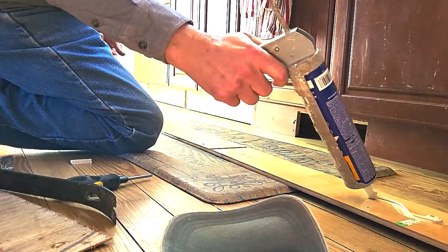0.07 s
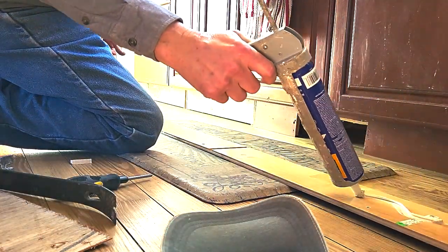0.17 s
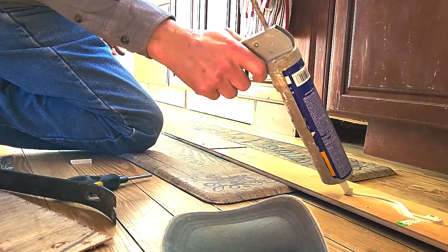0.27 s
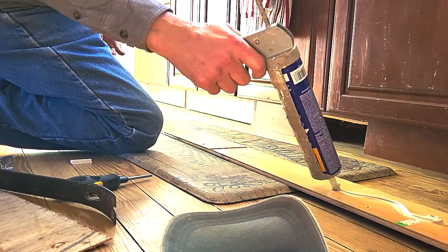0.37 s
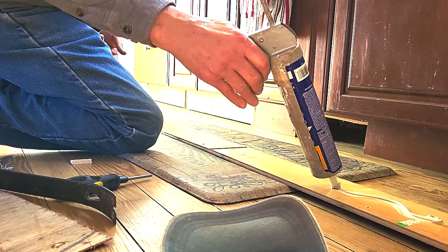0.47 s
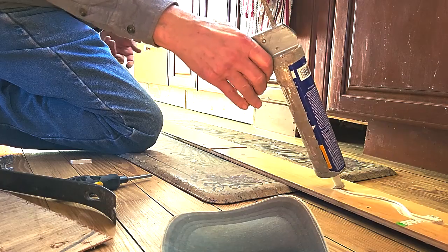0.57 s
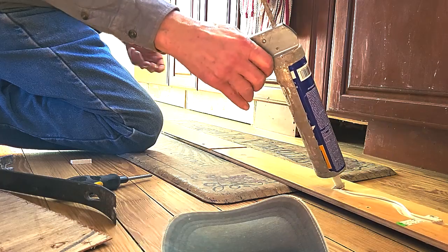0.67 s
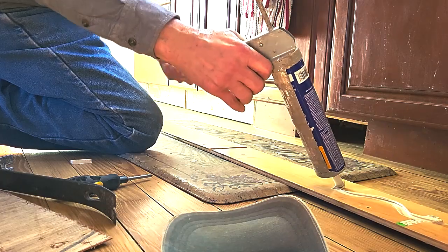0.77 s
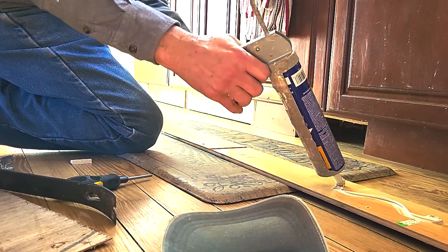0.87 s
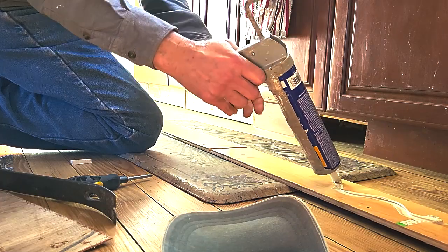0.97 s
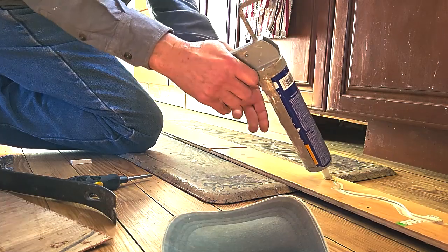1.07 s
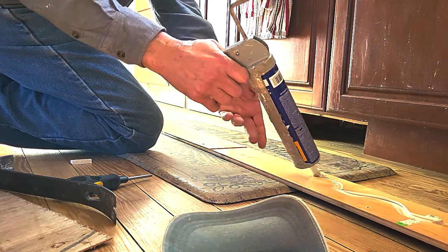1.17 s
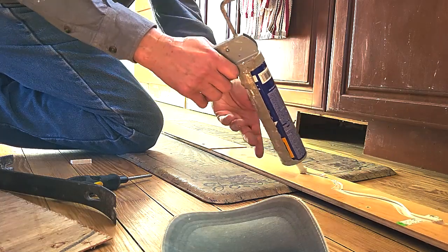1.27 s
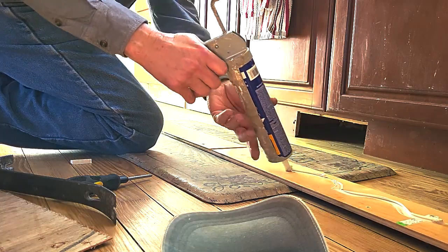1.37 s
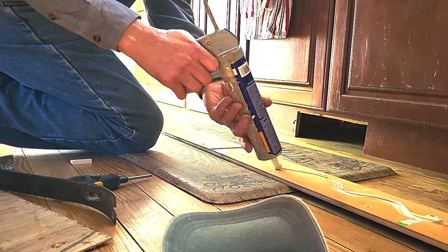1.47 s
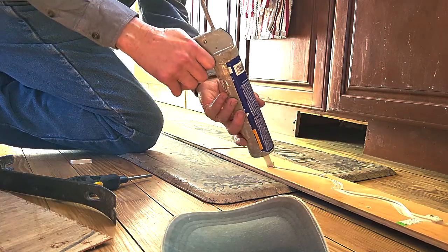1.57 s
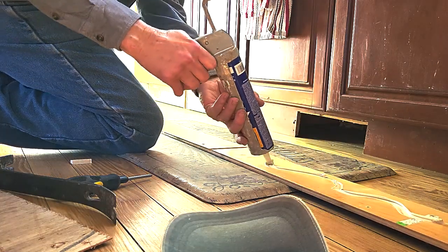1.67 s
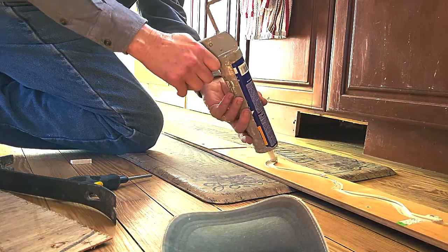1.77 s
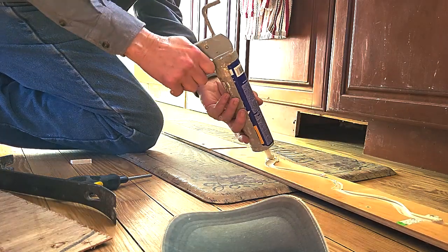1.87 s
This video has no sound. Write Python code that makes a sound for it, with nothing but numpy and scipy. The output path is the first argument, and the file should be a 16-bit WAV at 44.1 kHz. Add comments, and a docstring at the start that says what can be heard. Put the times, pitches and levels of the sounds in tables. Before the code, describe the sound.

Close metal clicks of a caulking gun's trigger and ratchet, then near silence with faint room hum

```python
"""The hum, low rumble and faint hiss of a quiet house come first, with a soft brush of cloth: filtered noise
and wavering sines. Then a caulking gun, close and a little to the right, ticks, snaps and rattles: bursts
of rough contact excite modes of its steel. The cartridge knocks hollowly, narrow hisses swell and a spring
ticks late. Decaying bands of noise form the room's answer to the gun, knocks and spring."""
import sys
import numpy as np
from scipy import signal
from scipy.fft import rfft, irfft
from scipy.io import wavfile
from scipy.ndimage import uniform_filter1d

SR = 44100
rng = np.random.default_rng(int(sys.argv[2]) if len(sys.argv) > 2 else 0)


def gain_from_db(level_db):
    """Convert decibel levels to linear amplitude factors (20 dB per decade)."""
    decades = np.asarray(level_db, float) / 20
    return 10 ** decades


def file_out(sig):
    """Save sig as 16-bit WAV at sys.argv[1]."""
    # one column per channel
    cols = np.atleast_2d(sig).T
    # limit, then scale
    lim = np.clip(cols, -1, 1)
    pcm = np.round(lim * 32767).astype(np.int16)
    wavfile.write(sys.argv[1], SR, pcm)


N = 83790  # length in samples
HIT_N = 8192  # samples in one contact and its direct ring


def band(x, lo_hz, hi_hz, order=2):
    """Butterworth band-pass: passes the range between two edges with a maximally flat response."""
    sos = signal.butter(order, [lo_hz, min(hi_hz, .48 * SR)], "band", fs=SR, output="sos")
    return signal.sosfilt(sos, x)


def ring(x, modes):
    """Modal superposition: x drives damped resonators, each a single complex pole."""
    out = 0
    for hz, db, t60_s in modes:
        pole = np.exp(2j * np.pi * hz / SR - np.log(1000) / (t60_s * SR))
        out = out + gain_from_db(db) * signal.lfilter([1], [1, -pole], x).imag
    return out


def unit(x):
    """Power normalisation: scales to rms 1."""
    return x / np.sqrt(np.mean(x ** 2))


def peak(x):
    """Short-time normalisation: sqrt(2) times the largest rms over 256 samples becomes 1."""
    return x / np.sqrt(2 * np.max(uniform_filter1d(x ** 2, size=256)))


def walk(rate_hz):
    """Slow modulation: random levels held for 1 / rate_hz and smoothed twice."""
    hold = int(SR / rate_hz)
    steps = np.repeat(rng.standard_normal(N // hold + 1), hold)
    return 0.6 * uniform_filter1d(uniform_filter1d(steps, hold), hold)[:N]


def sides(pan_db):
    """Level panning: left and right gains whose ratio, left over right, is pan_db."""
    return gain_from_db(np.array([[pan_db], [-pan_db]]) / 2)


# Spectrum of the quiet house. Each row: frequency in Hz, relative noise density in dB per Hz.
HOUSE_SPECTRUM = [(12, -24.5), (24, -7), (53, -3.5), (86, -7), (124, -4.5), (156, -11), (189, -5),
                  (218, -14.5), (244, -15), (270, -12), (340, -16.5), (440, -23), (520, -23.5),
                  (670, -28.5), (1020, -29), (1250, -36), (1600, -40), (2200, -38.5), (2700, -46.5),
                  (3600, -44.5), (4600, -43), (5400, -40.5), (7700, -44.5), (8600, -54), (10500, -49.5),
                  (12500, -54.5), (13200, -57.5), (15500, -62.5), (16500, -69.5)]
HOUSE_DB = -56.5  # rms of both sides together, before the low drift
SAME_HZ, BASS_SIDE, SIDE_MAX = 900, .07, 0.82  # the side share grows up to about SAME_HZ


def house():
    """Coloured noise with frequency-dependent coherence: rumble and hiss, nearly alike at both sides when low."""
    f = np.arange(N // 2 + 1) * SR / N + 1e-9
    hz, db = np.array(HOUSE_SPECTRUM).T
    colour = gain_from_db(np.interp(np.log(f), np.log(hz), db))
    mid, side = rfft(rng.standard_normal((2, N))) * colour
    side = side * np.minimum((f / SAME_HZ) ** 1.4 + BASS_SIDE, SIDE_MAX)
    air = gain_from_db(HOUSE_DB) * unit(irfft(np.array([mid + side, mid - side]), N))
    low = band(air, 9.7, 410)
    return air + low * (gain_from_db(0.5 * walk(4.9)) - 1)  # only the low band drifts


# Partials of the mains hum. Each row: centre frequency in Hz, rms in dB about which the level wavers.
HUM_PARTIALS = [(59.5, -67), (119.5, -60.5), (185, -68), (241, -70.5)]
HUM_WAVER_DB = -2  # per unit of walk


def hum():
    """Additive synthesis: mains partials, each with slow amplitude and phase modulation."""
    t, out = np.arange(N) / SR, 0
    for hz, db in HUM_PARTIALS:
        level = np.sqrt(2) * gain_from_db(db + HUM_WAVER_DB * walk(7.3))
        cycles = hz * t + 0.29 * walk(6.2) + rng.random()
        out = out + level * np.sin(2 * np.pi * cycles)
    return out


# Course of the brushing. Each row: time in seconds, gain in dB.
BRUSHING = [(0, -70), (.08, -77.5), (.7, -87), (0.899, -78.5), (1.049, -81), (1.15, -82.5), (1.399, -87.5),
            (1.501, -94), (1.57, -78), (1.7, -79.5), (1.76, -87), (1.9, -74)]
# Resonances of the cloth. Each row: centre in Hz, width in Hz, relative level in dB.
WEAVE_RESONANCES = [(2080, 700, 3), (4400, 810, -1), (6500, 1200, -2)]


def cloth():
    """Friction noise: fine random contacts heard through broad resonances of uneven level."""
    mid, side = rng.standard_normal((2, N))
    fibres = np.array([mid + .6 * side, mid - 0.79 * side])
    rub = 0
    for hz, width, db in WEAVE_RESONANCES:
        rub = rub + gain_from_db(db + 1.8 * walk(15)) * unit(band(fibres, hz - width / 2, hz + width / 2))
    times, levels_db = np.array(BRUSHING).T
    return gain_from_db(np.interp(np.arange(N) / SR, times, levels_db)) * rub


# Decay of the room. Each row: frequency in Hz, t60 in seconds, relative starting level in dB.
ROOM_DECAY = [(300, 0.24, -17), (800, 0.66, -13.5), (1470, 0.7, -18.5), (2200, 0.49, -19),
              (3660, 0.48, -20), (5960, 0.46, -23.5), (8500, 0.27, -21.5), (10850, 0.3, -14.5),
              (15000, 0.15, -15.5)]
# Bands of the slower tail from the next room. Each row: lower edge in Hz, upper edge in Hz.
NEXT_ROOM_BANDS = [(1930, 2070), (2290, 2480)]
LATE_T60_S, LATE_DB = 1, -31.5  # that tail's decay, and its level relative to the same reference
BUILD_S = 0.006  # time constant with which reflections build up


def reflections():
    """Statistical reverberation: noise bands and the exponential decay of each."""
    t = np.arange(SR) / SR
    hz, t60_s, start_db = np.array(ROOM_DECAY).T
    centres = 150 * 2 ** np.arange(0, 7, .5)
    noise = [band(rng.standard_normal((2, 2 * SR)), c / 2 ** 0.31, c * 2 ** 0.24) for c in centres]
    noise.append(sum(band(rng.standard_normal((2, 2 * SR)), *edges) for edges in NEXT_ROOM_BANDS))
    t60 = np.interp(np.log(centres), np.log(hz), t60_s)[:, None]
    db = np.interp(np.log(centres), np.log(hz), start_db)[:, None]
    decay = np.vstack([gain_from_db(db - 60 * t / t60), gain_from_db(LATE_DB - 60 * t / LATE_T60_S)])
    return np.array(noise), decay * (1 - np.exp(-t / BUILD_S)) / 10


def room(x, walls):
    """Convolution with a diffuse response, cut afresh from the noise and unlike at the two microphones."""
    noise, decay = walls
    i = rng.integers(SR)
    response = np.einsum("bct,bt->ct", noise[:, :, i:i + SR], decay)
    return signal.fftconvolve(x, response, axes=1)


RISE_SHARE = .2  # rise time constant over decay time constant
UNLIKE = .7  # amplitude of each side's own noise beside the common noise
LAG_S = .0001  # the left microphone hears the contact later


def chatter(decay_s):
    """Rough-contact excitation: a noise burst with a fast rise and decay, partly unlike and later at the left."""
    t = np.arange(HIT_N) / SR
    same, left, right = rng.standard_normal((3, HIT_N))
    envelope = np.exp(-t / decay_s) * (1 - np.exp(-t / (RISE_SHARE * decay_s)))
    hit = envelope * (same + UNLIKE * np.array([left, right]))
    return np.array([np.roll(hit[0], round(LAG_S * SR)), hit[1]])


# Bands in which the steel is balanced. Each row: lower edge in Hz, upper edge in Hz.
STEEL_BANDS = [(1750, 2750), (2750, 5300), (5300, 8100), (8100, 11500), (11500, 16000)]
# Unresonant crack of the contact: one level in dB per band, beside modes at 0 dB in the direct sound.
CRACK_LEVELS = [-7, -1, -1, 3, 5]


def voice(hit, modes, k, ring_db):
    """Source and resonator: in band k the contact's crack joins the modes it excites, at rms 1."""
    lo, hi = STEEL_BANDS[k]
    own_modes = [m for m in modes if lo <= m[0] < hi]
    steel = band(ring(hit, own_modes), lo / 1.007, hi * 1.117)
    crack = band(hit, lo, hi, order=4)
    return unit(gain_from_db(ring_db) * unit(steel) + gain_from_db(CRACK_LEVELS[k]) * unit(crack))


# Band of the gun's body, below the steel bands: lower edge in Hz, upper edge in Hz.
BODY_BAND = (680, 1150)
GUN_PAN_DB, ROOM_PAN_DB = -2.5, -4  # left over right, direct and by way of the room
ROOM_RING_DB, ROOM_RING_SHARE = 0.5, .45  # toward the walls: level of the modes, factor on their t60


def gun(walls, clicks, modes, body_db):
    """Directivity: the near sound shows each mode, while the walls get a colour smoothed over all directions."""
    out = np.zeros((2, N + 2 * SR))
    blow = signal.unit_impulse(HIT_N)
    wide = [(hz, db, t60_s * ROOM_RING_SHARE) for hz, db, t60_s in modes]  # shorter, so broader
    smooth = [voice(blow, wide, k, ROOM_RING_DB) for k in range(len(STEEL_BANDS))]
    for start_s, chatter_s, *bands_db in clicks:
        hit, i = chatter(chatter_s), int(start_s * SR)
        near = far = gain_from_db(bands_db[0] + body_db) * peak(band(hit, *BODY_BAND))
        for k, db in enumerate(bands_db):
            sound = gain_from_db(db) * peak(voice(hit, modes, k, 0))
            near = near + sound
            far = far + np.sqrt(np.mean(sound ** 2)) * smooth[k]
        wet = sides(ROOM_PAN_DB) * room(far, walls)
        out[:, i:i + HIT_N] += sides(GUN_PAN_DB) * near
        out[:, i:i + wet.shape[1]] += wet
    return out[:, :N]


# Clicks of the steel parts. Each row: start in seconds, chatter decay constant in seconds, then
# five short-time peaks in dB before panning, one per steel band.
TRIGGER_CLICKS = [(.0901, 0.0036, -38, -40, -40, -53, -53), (.130, .004, -58, -58, -56, -72, -74),
                  (.189, .004, -61, -62, -58, -78, -80), (.4068, .002, -45, -45, -48, -52, -50),
                  (0.4091, 0.0038, -30, -29, -27.5, -36, -31.5), (.4128, .002, -32, -28, -29, -35, -34),
                  (.428, .004, -38, -46, -46, -58, -56), (.4351, 0.002, -19, -18.5, -20, -40.5, -35.5),
                  (.4425, 0.0042, -22, -27.5, -22, -39.5, -36.5), (.4500, 0.003, -24, -21, -20, -30, -36),
                  (.4552, 0.0019, -23, -20.5, -22, -47.5, -47.5),
                  (.4590, 0.0021, -21.5, -32, -27.5, -36, -34), (1.7376, .0016, -85, -72, -65, -84, -89)]
# Modes of frame, rod and trigger. Each row: frequency in Hz, level in dB relative within its steel band,
# t60 in seconds in the direct sound.
TRIGGER_MODES = [(1985, 1, .055), (2160, -2, .05), (2300, -7, .04), (2400, 0, .06), (2570, -8, .04),
                 (1840, -8, .04), (2865, -4, .03), (3620, -7, .015), (3910, -3, .02), (4297, 0, .03),
                 (4830, 0, .035), (5300, -7, .012), (5830, -4, .025), (6100, -5, .025), (6700, -5, .015),
                 (7180, 2, .035), (7950, -3, .02), (9700, 0, .01), (10700, -2, .008), (12900, 0, .005),
                 (14300, -2, .005)]


def trigger(walls):
    """Impact excitation of modes: the steel trigger parts tick and rattle, with a weak body below."""
    return gun(walls, TRIGGER_CLICKS, TRIGGER_MODES, body_db=-21.5)  # relative to the lowest band


# Knocks of the cartridge. Each row: start in seconds, peak in dB before panning, left over right in dB.
CARTRIDGE_KNOCKS = [(.095, -61, 5.5), (.4095, -54, 7), (.4615, -33.5, 4)]
# Modes of the cartridge. Each row: frequency in Hz, relative level in dB before the band-pass, t60 in seconds.
TUBE_MODES = [(307, 13, .11), (740, -7, .07), (795, -5, .09), (850, -7, .06), (250, -6, .04), (385, 0, .05),
              (530, -6, .05)]
PUSH_S = 0.00061  # length of one push


def cartridge():
    """Soft-impact excitation: a smooth sine-squared push rings the modes of the hollow tube."""
    out = 0
    for start_s, db, pan_db in CARTRIDGE_KNOCKS:
        t = np.arange(N) / SR - start_s
        push = np.where((t > 0) & (t < PUSH_S), np.sin(np.pi * t / PUSH_S) ** 2, 0)
        tone = band(ring(push, TUBE_MODES), 310, 1600)
        out = out + gain_from_db(db) * sides(pan_db) * tone / np.abs(tone).max()
    return out


# Snaps of the ratchet pawl. Each row: start in seconds, chatter decay constant in seconds, then
# five short-time peaks in dB before panning, one per steel band.
PAWL_SNAPS = [(0.236, .002, -36.5, -23, -18.5, -27, -24.5), (0.2393, 0.0024, -36, -25.5, -22, -34.5, -31)]
# Modes of the pawl. Each row: frequency in Hz, level in dB relative within its steel band,
# t60 in seconds in the direct sound.
PAWL_MODES = [(2140, 5.5, 0.028), (1900, -6, 0.0092), (2550, -3.5, .02), (3090, -9.5, .015),
              (4300, 0, 0.01), (4340, 6, 0.012), (5800, -9.5, .02), (6750, 0.5, .03), (7400, -1.5, .02),
              (7250, -0.5, 0.0087), (9200, -3.5, 0.0033), (9775, 14, .02), (10640, -13.5, .015),
              (10500, -5, 0.0079), (14000, 0.5, 0.012), (14670, -3, .015), (12500, -6, 0.012)]


def pawl(walls):
    """Impact excitation of modes: the ratchet pawl snaps, with its own modes and a stronger body."""
    return gun(walls, PAWL_SNAPS, PAWL_MODES, body_db=-14.5)  # relative to the lowest band


# Faint hisses, perhaps the nozzle dragging. Each row: start in seconds, length in seconds, centre in Hz,
# width in Hz, level in dB at the height of the swell.
DRAG_HISSES = [(0.77, .29, 1815, 91, -73.5), (0.796, 0.21, 2276, 109, -75.5), (.85, .2, 1530, 91.4, -79),
               (1.064, 0.31, 2267, 91, -82.5), (1.3, 0.21, 1967, 149.7, -85),
               (1.54, 0.26, 4170, 1290, -77.5), (1.543, 0.26, 2973, 900, -83),
               (0.817, 0.14, 3120, 800, -81.5), (1.37, 0.091, 6500, 2970, -79.5)]


def hisses():
    """Band-limited noise under an envelope: narrow hisses swell and fade."""
    t, out = np.arange(N) / SR, 0
    for start_s, length_s, hz, width, db in DRAG_HISSES:
        swell = np.sin(np.pi * np.clip((t - start_s) / length_s, 0, 1)) ** .5
        mid, side = rng.standard_normal((2, N))
        noise = np.array([mid + 0.77 * side, mid - 0.48 * side])
        out = out + gain_from_db(db) * swell * unit(band(noise, hz - width / 2, hz + width / 2))
    return out


# Modes of the spring. Each row: frequency in Hz, relative level in dB before the band-passes, t60 in seconds.
SPRING_MODES = [(2000, -9, .025), (4050, -7, .02), (4890, 0, .035), (5030, -2, .04), (5180, -1, .03),
                (5900, -7, .008), (6500, -6, .012), (7800, -7, .015)]
# Bands in which the spring is heard. Each row: lower edge in Hz, upper edge in Hz.
SPRING_BANDS = [(1750, 2300), (3900, 8200)]
TICK_S, TICK_CHATTER_S = 1.8385, 0.0024  # start and decay constant of the contact
TICK_DB, TICK_PAN_DB = -46, -9.5  # short-time peak before panning, left over right


def spring():
    """Modal ringing in two pass-bands: one small late tick of the spring, well to the right."""
    out, i = np.zeros((2, N + HIT_N)), int(TICK_S * SR)
    tone = ring(chatter(TICK_CHATTER_S), SPRING_MODES)
    tick = sum(band(tone, *edges, order=3) for edges in SPRING_BANDS)
    out[:, i:i + HIT_N] = gain_from_db(TICK_DB) * sides(TICK_PAN_DB) * peak(tick)
    return out[:, :N]


def scene():
    """Linear superposition: gun, knocks and spring with the room's answer, over hisses, cloth and house."""
    walls = reflections()
    small = spring() + cartridge()
    steel = trigger(walls) + pawl(walls)
    drag = hisses()
    answer = room(small, walls)[:, :N]
    return steel + drag + small + answer + house() + hum() + cloth()


def band_limit(x):
    """A steep low-pass at the top of the band."""
    return signal.sosfilt(signal.butter(12, 17150, fs=SR, output="sos"), x)


def record(dry):
    """Low-pass filtering: a steep elliptic filter removes the top above 16.3 kHz."""
    lowpass = signal.ellip(8, .2, 60, 16300, fs=SR, output="sos")  # 0.2 dB ripple, 60 dB stop-band
    mix = signal.sosfilt(lowpass, dry)
    return band_limit(mix)


dry = scene()
out = record(dry)
file_out(out)
```